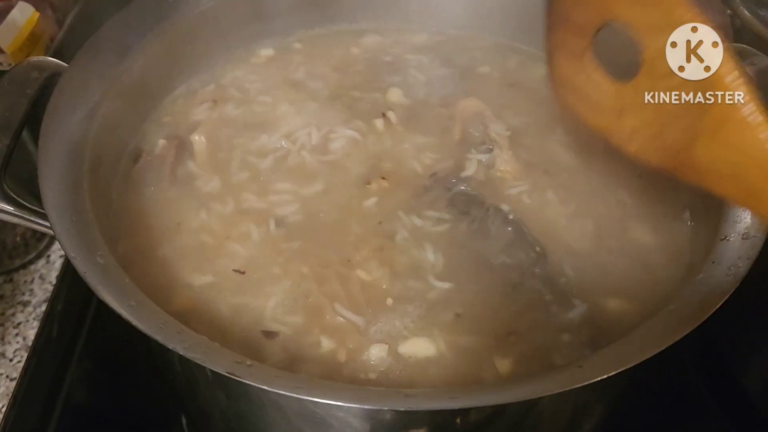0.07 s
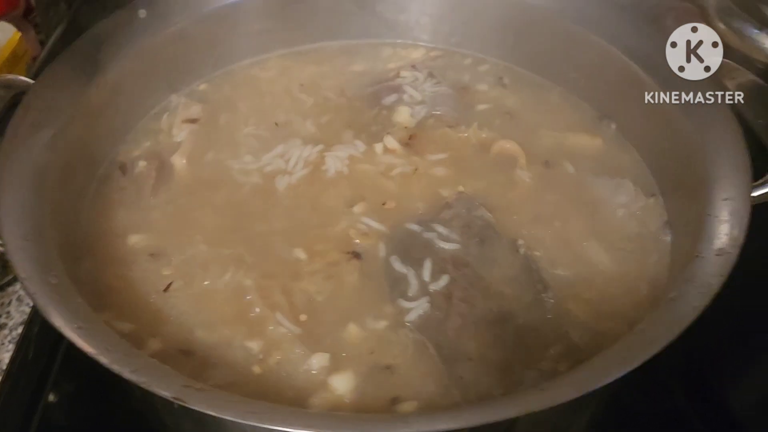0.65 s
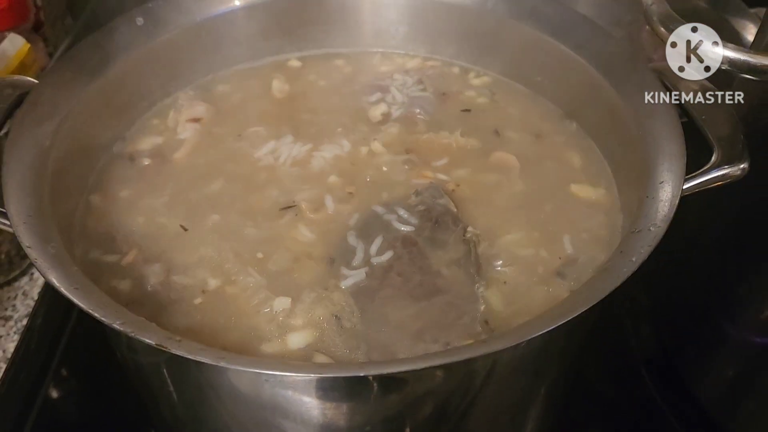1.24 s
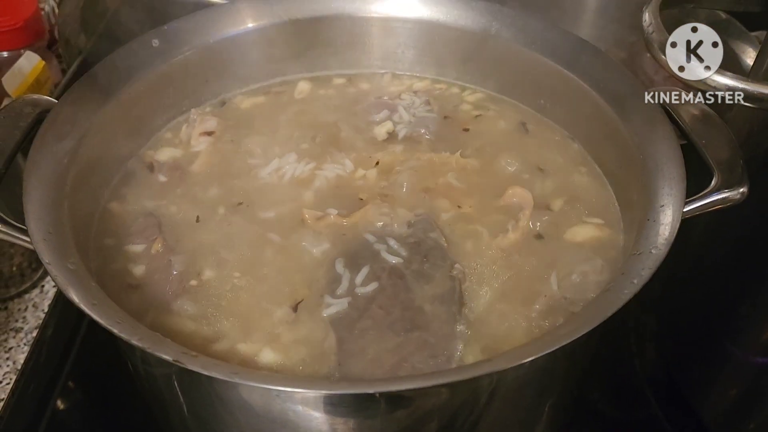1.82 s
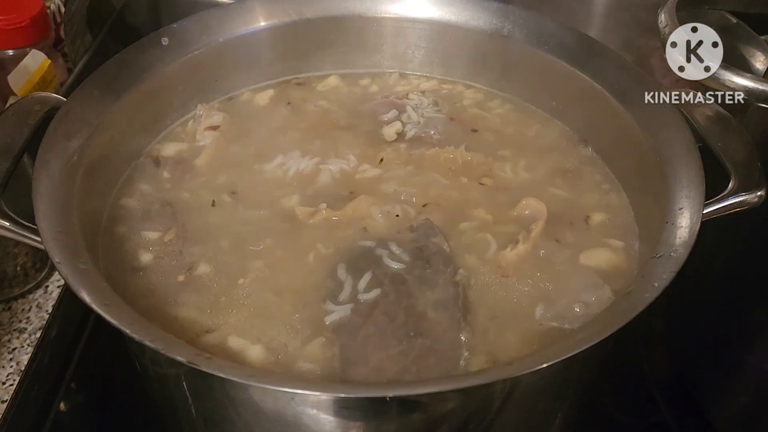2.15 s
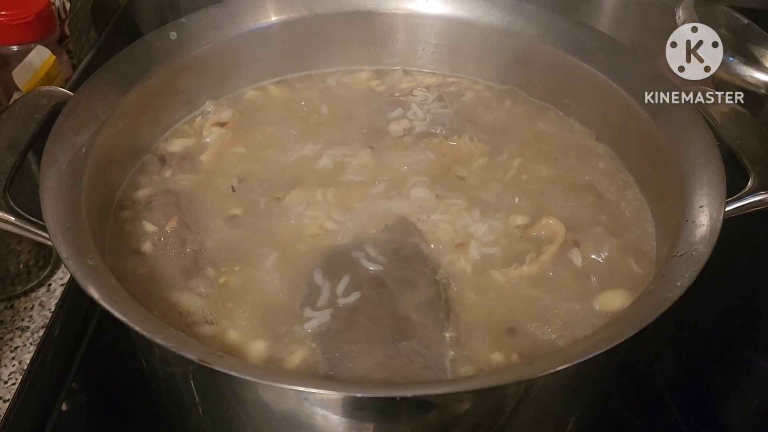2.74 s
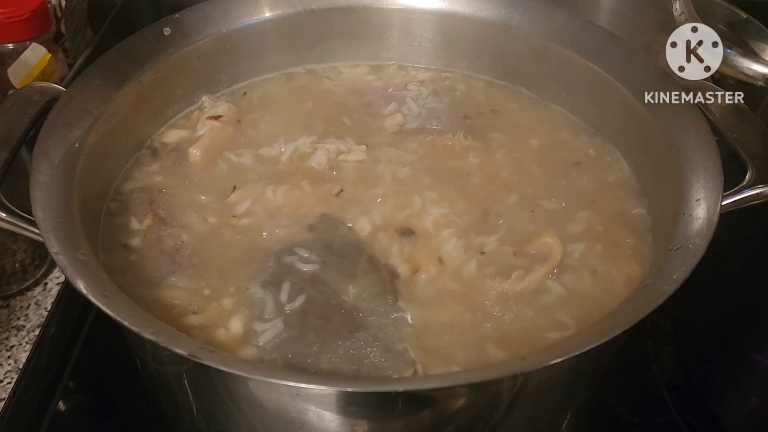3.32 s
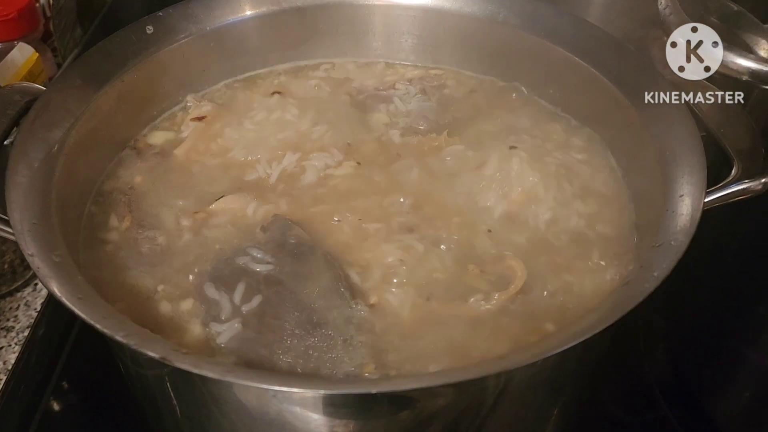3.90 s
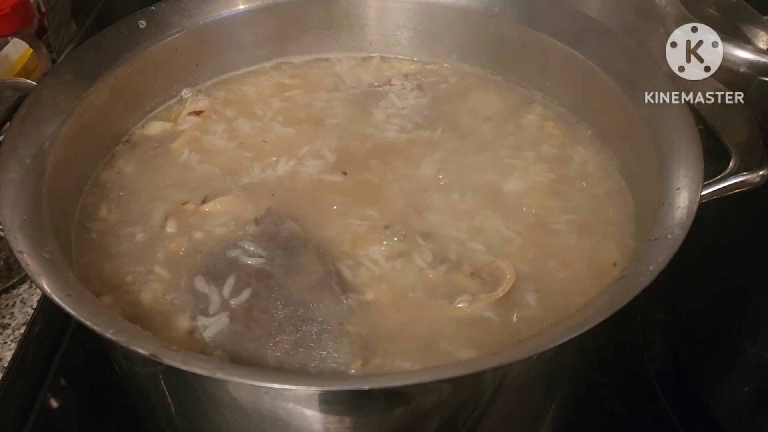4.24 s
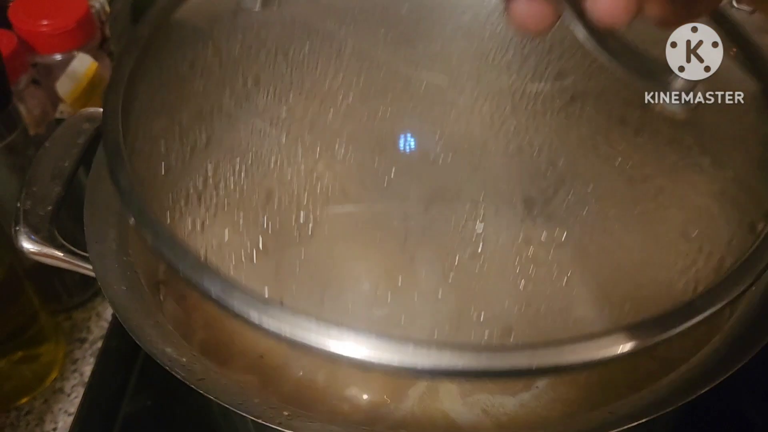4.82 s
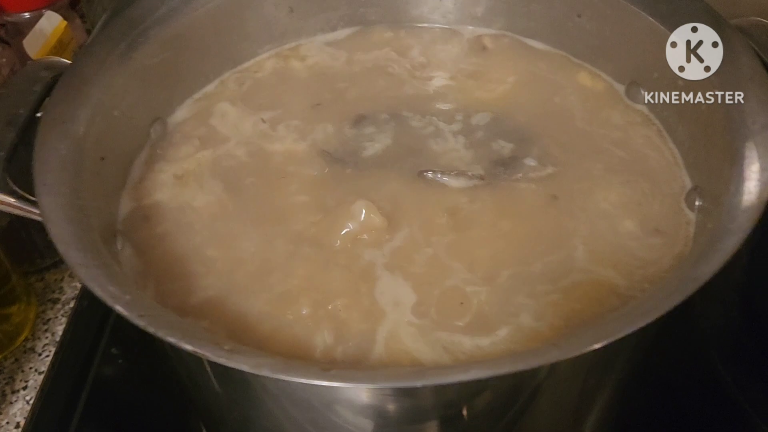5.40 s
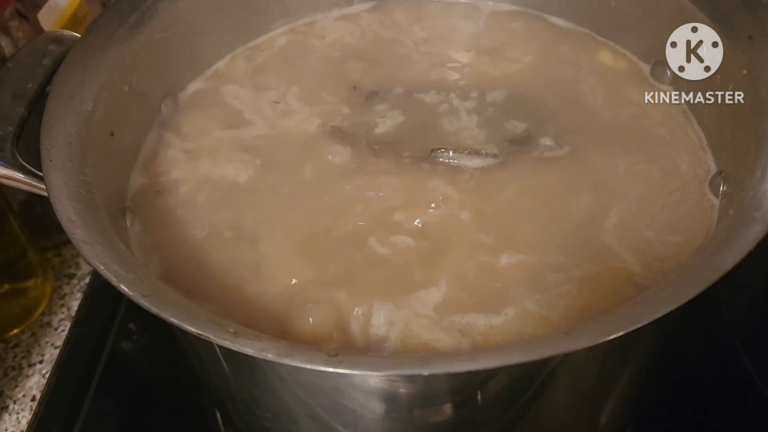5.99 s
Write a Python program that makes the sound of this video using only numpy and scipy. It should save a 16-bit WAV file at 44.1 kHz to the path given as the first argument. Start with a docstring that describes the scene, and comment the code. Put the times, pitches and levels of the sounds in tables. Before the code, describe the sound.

Porridge bubbles and steam hisses in a pot under a humming extractor fan, with cookware knocks at the start and end.

```python
"""Porridge under an extractor hood

Turbulence rumbles and rushes in the duct while uneven inflow shakes the tones of the fan. Below it,
bubbles burst in the porridge and steam jets hiss in swells, with thin whistles and a faint note.
The sound breaks off briefly and fades in without the steam, the fan lighter and an octave higher.
Knocks near the start and the end excite the damped modes of the cookware; a small kitchen answers."""
import sys
import numpy as np
from scipy import signal
from scipy.fft import rfft, irfft
from scipy.io import wavfile

SR = 44100
rng = np.random.default_rng(int(sys.argv[2]) if len(sys.argv) > 2 else 0)


def unload_wav(signal):
    """Save mono or channel-first audio to the path in sys.argv[1] as 16-bit WAV at rate SR, clipped to [-1, 1]."""
    wavfile.write(
        sys.argv[1],
        SR,
        np.round(np.clip(np.atleast_2d(signal).T, -1, 1) * 32767).astype(np.int16),
    )


N = 272097
TIME = np.arange(N) / SR
FREQ = np.maximum(np.arange(N // 2 + 1) * SR / N, 1)

# spectra of the duct's rumble and the rush of air, before and after the break: f/Hz, relative level/dB
EARLY_RUMBLE_SPECTRUM = [(30, -24), (45, -16), (62, -7), (82, -0.5), (100, -0.5), (122, -5.5), (170, 0.5),
                         (220, -3.5), (270, -15), (326, -13.5), (360, -19.5), (460, -32.5), (900, -86)]
EARLY_RUSH_SPECTRUM = [(300, -27), (460, -7), (600, 1), (690, -3.5), (770, -6.5), (830, -3), (910, -9.5),
                       (1070, -9.5), (1230, -8.5), (1370, -2.5), (1500, -7.5), (1630, -11.5), (1780, -13),
                       (1900, -8.5), (2050, -12.5), (2350, -17.5), (4300, -20.5), (5500, -25.5),
                       (8000, -29.5), (15000, -48)]
LATE_RUMBLE_SPECTRUM = [(50, -23), (70, -26), (100, -11.5), (145, -1), (195, -0.5), (235, -3), (340, 0),
                        (465, -5), (590, -15.5), (660, -10.5), (725, -24), (770, -14.5), (950, -26),
                        (2000, -70)]
LATE_RUSH_SPECTRUM = [(700, -20), (1000, -3), (1350, 1), (1800, -2.5), (2300, -8), (2750, -1),
                      (3450, -10.5), (3950, -8), (4800, -14.5), (6500, -17.5), (9500, -19), (15000, -22.5)]
# likeness of the air noise at the two ears: f/Hz, coherence
EAR_COHERENCE = [(60, 1), (130, 1), (220, 1), (320, 0.9), (640, 0.5), (1400, 0.22), (3100, 0),
                 (15000, -0.16)]
# balance of the noise, before and after the break: f/Hz, left minus right/dB
EARLY_BALANCE = [(60, 2.5), (110, 0.5), (200, 5), (380, 3.5), (700, -1), (1290, 1.5), (2380, 2.5),
                 (4400, -1.5), (8120, -0.5), (15000, 2.5)]
LATE_BALANCE = [(60, 7), (110, 0.5), (200, 0.5), (380, 2.5), (700, 1), (1290, -0.5), (2380, 1.5), (4400, 1),
                (8120, -0.5), (15000, -0.5)]
# fan tones before and after the break, shaft first:
# f/Hz, level/dB, turbulent share, scatter/Hz, left minus right/dB, left phase lead/rad
EARLY_FAN_TONES = [(26.4, -40.5, 0.71, .5, -1, 0), (614.8, -32, 0.39, 21, 10.5, -0.17),
                   (722, -47, 2, 12, 4.5, 0), (1019, -50, 1.8, 12, 5.5, 0)]
LATE_FAN_TONES = [(56.4, -48.5, 0.76, 0.74, 1.6, 0), (1227, -39.5, 0.5, 32, 6.9, -0.71)]
# swells of the two late fan tones: t/s, hum gain/dB, whine gain/dB
FAN_SWELLS = [(4.65, 1, 2), (4.9, 1, 3.5), (5.12, 1, -2), (5.35, -9, 1.5), (5.7, 2, 0.5), (5.88, 5, 2.5),
              (6.15, 7, -2.5)]
# spectrum of the steam jet: f/Hz, relative level/dB
STEAM_SPECTRUM = [(1500, -13), (2800, -0.5), (4500, -0.5), (5200, -1.5), (6300, 2), (7300, 2), (8300, 1.5),
                  (8900, -4.5), (9800, -5.5), (11200, -3), (13600, -8.5), (14800, -3.5), (15500, -20)]
# puffs of steam: start t/s, length/s, level/dB, rise/s, fall/s
STEAM_PUFFS = [(-0.05, 0.2, -39, 0.044, 0.35), (0, 2.4, -42.5, 0.042, 0.29), (1.13, 0.66, -38, 0.39, 0.2),
               (2.64, 0.24, -44, 0.097, 0.14), (3.585, 0.88, -41.5, 0.12, 0.2)]
# thin whistles of the steam: start t/s, length/s, settled f/Hz, climb/Hz, level/dB
STEAM_WHISTLES = [(1.28, 0.6, 8160, -1, -53), (1.42, 0.36, 6690, 1, -54.5), (1.28, 0.42, 6270, -1, -54),
                  (1.51, 0.09, 5560, -1, -49.5), (2, 0.08, 5560, -1, -49.5), (1.65, 0.15, 14800, 1, -51.5),
                  (2.698, 0.11, 15000, 1349, -49), (3.659, 0.8, 15290, 1401, -49)]
# harmonics of the note in the hiss, fundamental first: relative level/dB
NOTE_HARMONICS = [-1.5, -15.5, -15, -17]
# swells of that note: peak t/s, level/dB
NOTE_SWELLS = [(0.6, -50), (1.31, -49), (1.48, -41.5), (1.91, -45), (2.09, -43), (3.8, -50)]
# contacts of the cookware:
# t/s, pot/dB, spoon/dB, rim/dB, click/dB, thump/dB, left minus right/dB, click t60/s
CONTACTS = [(0.0453, -34, -15, -50, -40, -44, 12, 0.03), (0.0476, -24, -18, -50, -38, -22, -12, 0.03),
            (0.0546, -38, -17, -50, -42, -27, 0, 0.03), (5.7452, -42, -47, -24, -28, -38, -5, 0.016),
            (5.7466, -18.5, -32, -36, -36, -22, 2, 0.025), (5.7758, -35, -33, -16, -22, -23, -1, 0.018),
            (5.9345, -24, -36, -31, -21.5, -30, -5, 0.04), (5.9364, -11.5, -31, -36, -28, -17.5, 5, 0.05),
            (5.9385, -12, -24, -32, -29, -21, 3, 0.06), (5.9452, -22, -21, -38, -29, -14, 2, 0.07),
            (5.955, -23, -31, -45, -29, -24, 2, 0.07), (5.9658, -28, -29, -45, -32.5, -29, -6, 0.06)]
# modes of the full pot, its steel rim, the wooden spoon and the stove top: f/Hz, t60/s, relative level/dB
POT_MODES = [(790, 0.015, 1), (1020, 0.014, 0), (1270, 0.017, 4), (1410, 0.018, 8), (1800, 0.018, 3),
             (2330, 0.015, -2), (2560, 0.013, -4), (2930, 0.018, -2), (3450, 0.016, -11),
             (4430, 0.018, -10), (5050, 0.018, -11)]
RIM_MODES = [(5800, 0.012, -11), (7050, 0.009, -1), (8200, 0.008, -2), (8900, 0.009, 0), (10000, 0.007, -6),
             (11200, 0.007, -6), (13000, 0.007, -7), (14750, 0.009, -3)]
SPOON_MODES = [(530, 0.027, 9), (670, 0.035, 9.5), (758, 0.026, 4), (900, 0.015, 2), (1224, 0.022, 3.5),
               (2050, 0.014, -2.5), (2520, 0.011, -8.5), (3160, 0.012, -2.5), (3590, 0.018, -1.5),
               (4230, 0.013, -2.5), (4750, 0.01, -3)]
STOVE_MODES = [(92, 0.08, -8.5), (181, 0.063, -9), (251, 0.063, 0)]
# spectrum of a contact click: f/Hz, relative level/dB
CLICK_SPECTRUM = [(1200, -4), (3000, -2), (4700, -2), (6300, -8.5), (8300, -4), (10000, -7.5), (13500, -7),
                  (15500, -14)]


def airflow(spectrum, db, balance, flutter_db):
    """Turbulence radiates broadband noise, coherent at the two ears in the bass, diffuse in the treble."""
    mid, side = rfft(rng.standard_normal((2, N)))
    coherence = np.clip(across(EAR_COHERENCE), -.99, .99)
    ears = mid * np.sqrt(1 + coherence) + np.array([[1], [-1]]) * side * np.sqrt(1 - coherence)
    air = colour(irfft(ears * pan(across(balance)), N), spectrum)
    return air / np.std(air.mean(axis=0)) * undb(db + flutter_db * walk(22))


def fan_tones(tones, drift):
    """Random modulation: uneven inflow shakes the shaft and blade tones while the rotor speed drifts."""
    rotor_time = np.cumsum(1 + drift * walk(1.0)) / SR
    out = 0
    for hz, db, share, scatter_hz, pan_db, lead in tones:
        inflow = walk(scatter_hz) + 1j * walk(scatter_hz)
        # each ear also gets the tone along its own paths through the room
        paths = np.array([walk(scatter_hz) + 1j * walk(scatter_hz) for _ in range(2)])
        shake = 1 + share * (0.52 * inflow + 0.66 * min(hz / 600, 1) * paths)
        phase = 2 * np.pi * hz * rotor_time + np.array([[lead], [-lead]]) / 2
        tone = unit((shake * np.exp(1j * phase)).real)
        out = out + tone * undb(db) * pan(pan_db)
    return out


def swelling_fan():
    """Slow amplitude modulation: the fan's low hum and high whine each swell and ease."""
    times, *gains_db = np.transpose(FAN_SWELLS)
    return sum(fan_tones([tone], drift=0.00066) * undb(np.interp(TIME, times, db))
               for tone, db in zip(LATE_FAN_TONES, gains_db))


def steam_flow(leak_db):
    """Incoherent sources add in power: a steady leak and the puffs give the amplitude of the steam."""
    puff_power = sum((undb(db) * gate(start, length, rise, fall)) ** 2
                     for start, length, db, rise, fall in STEAM_PUFFS)
    return np.sqrt(undb(leak_db) ** 2 + puff_power)


def steam_hiss(flow):
    """Jet noise follows the flow; reflections from pot wall and hood interfere, leaving fine peaks."""
    jet = reflect(rng.standard_normal((2, N)), db=-8.5, t60=0.05)
    hiss = unit(colour(jet, STEAM_SPECTRUM)) * flow * undb(0.5 * walk(25))
    return irfft(rfft(hiss) * pan(across(EARLY_BALANCE)), N)


def steam_whistles(waver_hz, settle_s):
    """Flow tones sound as pressure builds, wavering most at the onset; the highest two climb in pitch."""
    waver = waver_hz * np.array([walk(299), walk(294)])
    out = 0
    for start, length, settled_hz, climb_hz, db in STEAM_WHISTLES:
        unsettled = np.exp(-np.maximum(TIME - start, 0) / settle_s)
        hz = settled_hz - climb_hz * unsettled + waver * (1 + 4 * unsettled)
        tone = unit(np.sin(2 * np.pi * np.cumsum(hz, axis=1) / SR))
        out = out + tone * undb(db) * gate(start, length, rise=0.033, fall=0.05)
    return out


def steam_note(flow, hz, waver_hz, flutter_db, swell_s, under_steam_db):
    """A faint harmonic series comes and goes in the hiss, each partial fluttering on its own."""
    phase = 2 * np.pi * np.cumsum(hz + waver_hz * walk(59)) / SR
    note = sum(np.sin(k * phase) * undb(db + flutter_db * np.array([walk(15), walk(15)]))
               for k, db in enumerate(NOTE_HARMONICS, 1))
    swells = sum(undb(db) * np.exp(-((TIME - peak) / swell_s) ** 2) for peak, db in NOTE_SWELLS)
    return unit(note) * np.hypot(swells, flow * undb(under_steam_db))


def knocks(thump_rise_s):
    """Impact excitation: each contact clicks and rings pot, spoon and rim; the stove top thumps late."""
    out = np.zeros((2, N))
    stove = ring(STOVE_MODES) * (1 - np.exp(-TIME / thump_rise_s))
    stove = stove / np.abs(stove).max()
    for onset, pot_db, spoon_db, rim_db, click_db, thump_db, pan_db, click_t60 in CONTACTS:
        click = unit(colour(rng.standard_normal((2, N)), CLICK_SPECTRUM)) * undb(-60 * TIME / click_t60)
        pot = undb(pot_db) * ring(POT_MODES)
        spoon = undb(spoon_db) * ring(SPOON_MODES)
        rim = undb(rim_db) * ring(RIM_MODES)
        blow = pot + spoon + rim + undb(click_db) * click + undb(thump_db) * stove
        start = int(onset * SR)
        out[:, start:] += (blow * pan(pan_db))[:, :N - start]
    return out


def ring(modes, detune=0.011):
    """Superposition of damped modes, peak 1; each point of contact tunes them a little differently."""
    t = TIME[:SR // 4]
    shift = 1 + detune * rng.uniform(-1.2, 1, len(modes))
    out = sum((-1) ** k * undb(db - 60 * t / t60) * np.sin(2 * np.pi * hz * shift[k] * t)
              for k, (hz, t60, db) in enumerate(modes))
    return np.pad(out / np.abs(out).max(), (0, N - len(t)))


def simmer(db, low_hz, high_hz, cycles, spread_db, count):
    """Bubble resonance: each burst in the thick porridge rings for a few damped cycles of rising pitch."""
    out = np.zeros((2, N))
    t = TIME[:SR // 20]
    for when, pitch, strength, place in rng.random((count, 4)):
        hz = low_hz * (high_hz / low_hz) ** pitch
        age = t * hz / cycles
        pop = np.sin(2 * np.pi * hz * t * (1 + 0.038 * age)) * np.exp(-age)
        start = int(when * (N - len(t)))
        out[:, start:start + len(t)] += pop * undb(spread_db * strength) * pan(8 * (place - .5))
    return unit(out) * undb(db)


def reflect(x, db, t60):
    """Reverberation: nearby surfaces add dense reflections that decay exponentially."""
    build_up = 1 - np.exp(-TIME / 0.00088)
    walls = rng.standard_normal((2, N)) * undb(-60 * TIME / t60) * build_up
    walls = unit(walls) / np.sqrt(N)
    return x + undb(db) * signal.fftconvolve(x, walls, axes=1)[:, :N]


def gain_control(x, threshold_db, slope, recover_db_per_s):
    """Compression: a sharp, bright sound turns the gain down at once; it creeps back up."""
    bright = signal.sosfilt(signal.butter(2, 1000, "high", fs=SR, output="sos"), x)
    power = signal.lfilter([1 / 200], [1, 1 / 200 - 1], np.mean(bright ** 2, axis=0))
    cut_db = slope * np.maximum(10 * np.log10(power + 1e-12) - threshold_db, 0)
    recovery = recover_db_per_s * TIME
    return x * undb(recovery - np.maximum.accumulate(cut_db + recovery))


def undb(db):
    """Amplitude ratio of a level in decibels."""
    return 10 ** (np.asarray(db) / 20)


def unit(x):
    """Normalisation to rms 1."""
    return x / np.sqrt(np.mean(x ** 2))


def across(points):
    """Interpolation of (f/Hz, value) points over logarithmic frequency."""
    hz, value = np.transpose(points)
    return np.interp(np.log(FREQ), np.log(hz), value)


def colour(x, points):
    """Spectral shaping by (f/Hz, level/dB) points, falling 12 dB an octave below the first."""
    roll_off = np.minimum(FREQ / points[0][0], 1) ** 2
    return irfft(rfft(x) * undb(across(points)) * roll_off, N)


def pan(db):
    """Left and right gains for an interaural level difference."""
    return undb(np.array([[1], [-1]]) * db / 2)


def walk(rate_hz):
    """Low-pass noise of rms 1 that changes about rate_hz times a second."""
    return unit(irfft(rfft(rng.standard_normal(N)) / (1 + (FREQ / rate_hz) ** 2), N))


def gate(start, length, rise, fall):
    """Trapezoidal envelope: it rises, holds until its length is up, then falls."""
    age = TIME - start
    return np.clip(age / rise, 0, 1) * np.clip(1 - (age - length) / fall, 0, 1)


def scene():
    """Superposition of hood, steam and pot, faded around the break, with the knocks on top."""
    bubbles = simmer(db=-48.5, low_hz=448, high_hz=2060, cycles=4.4, spread_db=10, count=450)
    early = airflow(EARLY_RUMBLE_SPECTRUM, db=-24, balance=EARLY_BALANCE, flutter_db=0.74)
    early += airflow(EARLY_RUSH_SPECTRUM, db=-33.5, balance=EARLY_BALANCE, flutter_db=0.56)
    early += fan_tones(EARLY_FAN_TONES, drift=0.0012)
    flow = steam_flow(leak_db=-52)
    early += steam_hiss(flow) + steam_whistles(waver_hz=44.7, settle_s=0.079)
    early += steam_note(flow, hz=1851, waver_hz=5.5, flutter_db=3.5, swell_s=0.067, under_steam_db=-17)
    late = airflow(LATE_RUMBLE_SPECTRUM, db=-30, balance=LATE_BALANCE, flutter_db=0.57)
    late += airflow(LATE_RUSH_SPECTRUM, db=-40, balance=LATE_BALANCE, flutter_db=0.35)
    late += swelling_fan()
    break_start_s, break_end_s = 4.468, 4.545  # the silence cuts off the quiet end of each fade
    fade_out = np.clip((4.522 - TIME) / 0.17, 0, 1) * (TIME < break_start_s)
    fade_in = np.clip((TIME - 4.498) / 0.18, 0, 1) ** 1.92 * (TIME > break_end_s)
    cookware = reflect(knocks(thump_rise_s=0.014), db=-5.0, t60=0.1)
    return (early + bubbles) * fade_out + (late + undb(-2.5) * bubbles) * fade_in + cookware


def record(dry):
    """Compression and band limiting: the level ducks after a sharp knock and the top treble is cut."""
    ducked = gain_control(dry, threshold_db=-22, slope=0.41, recover_db_per_s=4)
    low_pass = signal.ellip(10, .2, 70, 15600, fs=SR, output="sos")
    return signal.sosfilt(low_pass, ducked)


dry = scene()
out = record(dry)
unload_wav(out)
```